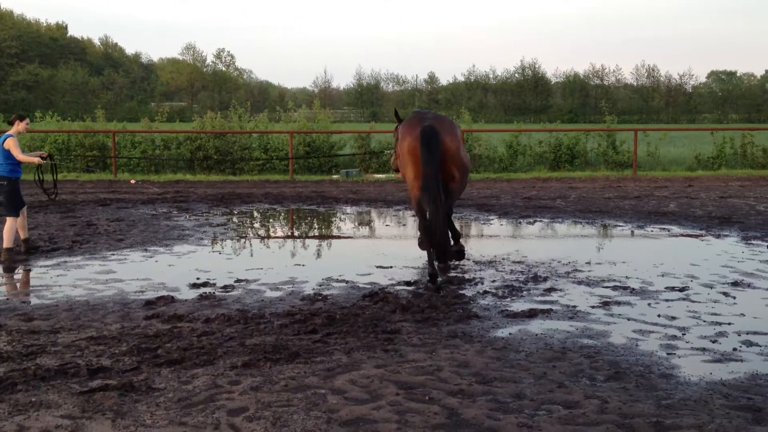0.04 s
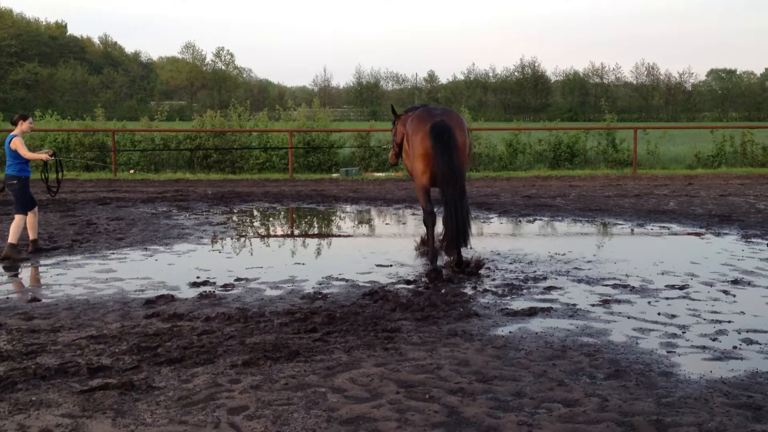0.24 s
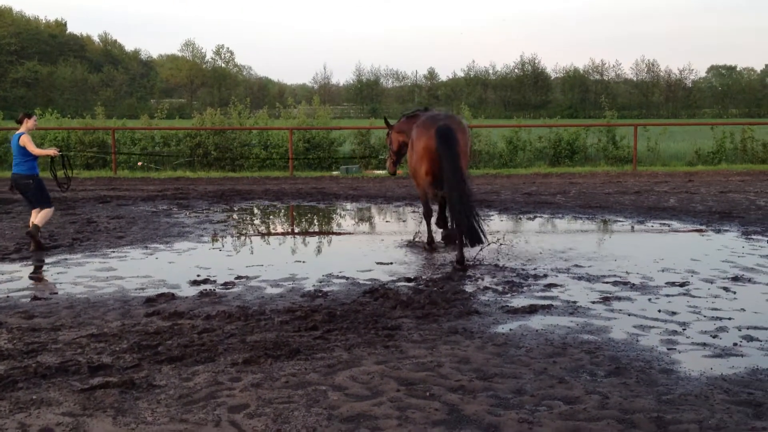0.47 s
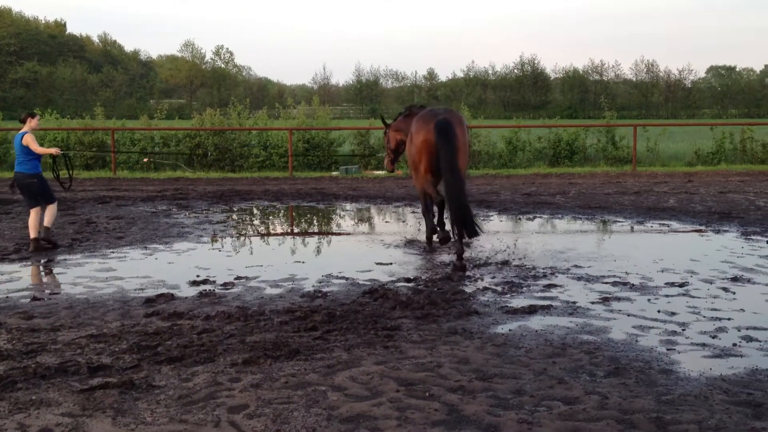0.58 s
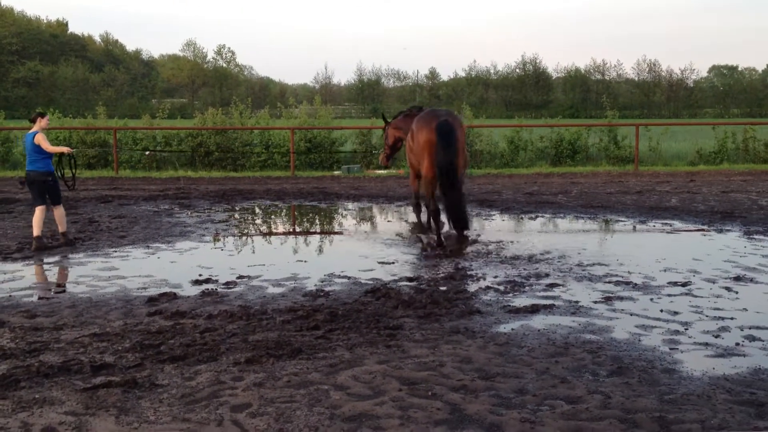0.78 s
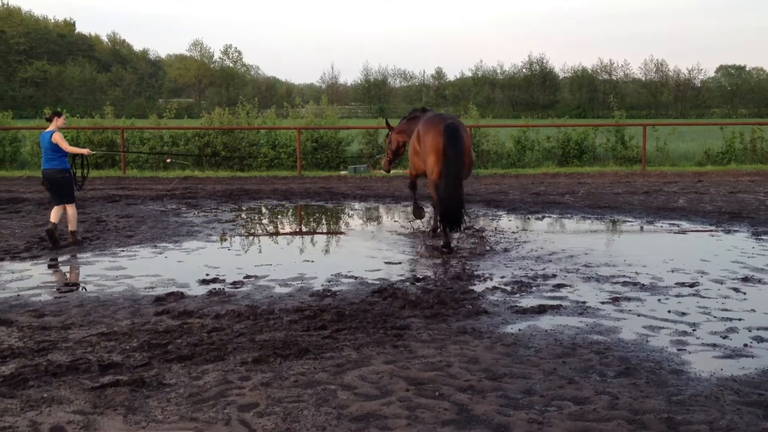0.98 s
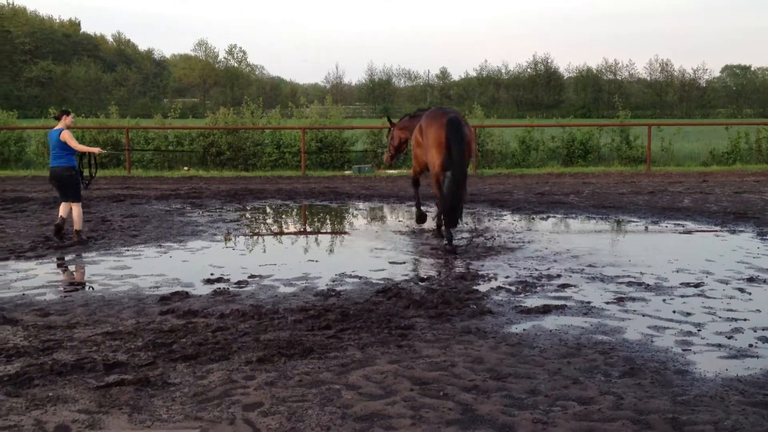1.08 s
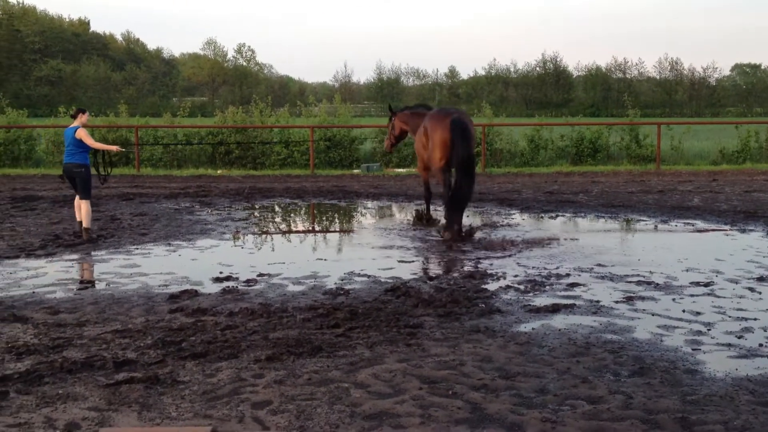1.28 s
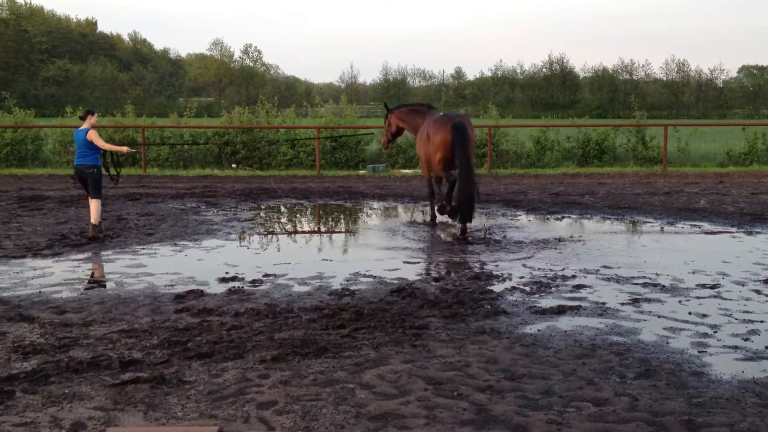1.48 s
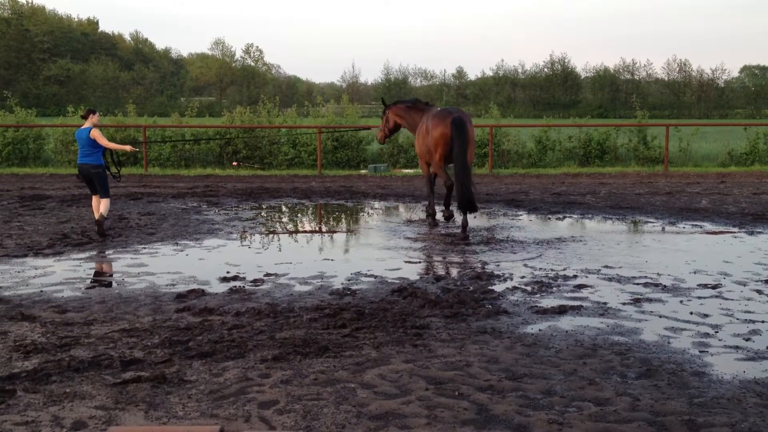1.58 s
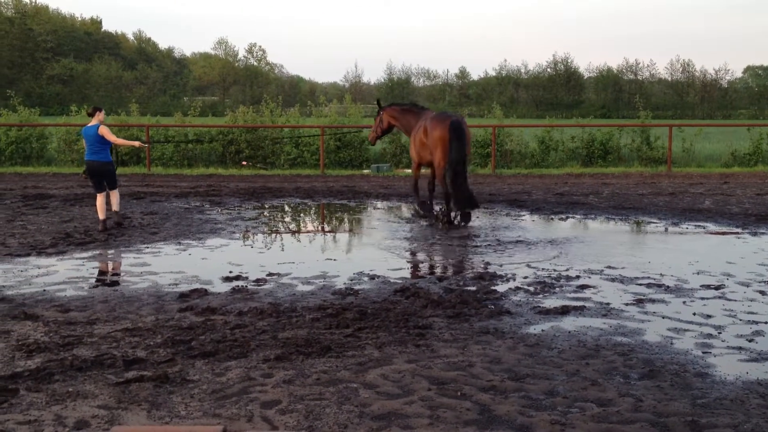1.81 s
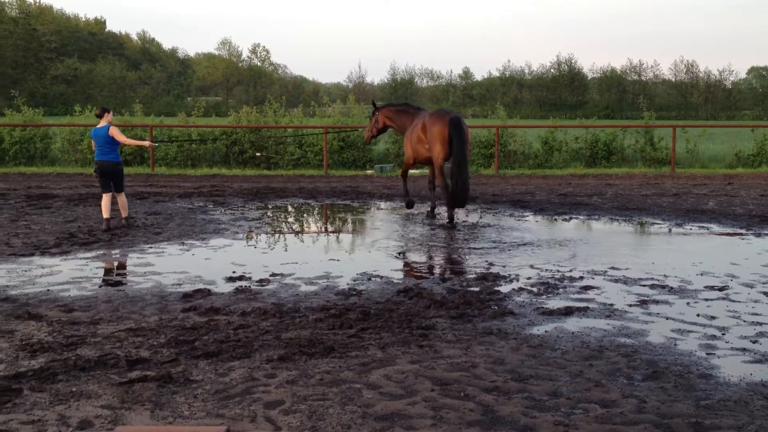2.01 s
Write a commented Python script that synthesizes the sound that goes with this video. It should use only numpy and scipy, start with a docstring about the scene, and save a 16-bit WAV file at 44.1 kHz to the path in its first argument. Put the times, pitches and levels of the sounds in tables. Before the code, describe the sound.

A horse's hooves splash through a shallow muddy puddle at a steady walk.

```python
"""A horse walks through a shallow muddy puddle in an open paddock, some metres away, two steps a second.
Each hoof slaps the water, traps a pocket of air that plops, and thuds into the mud; spray patters back
and muddy water closes around the hoof. Between the steps the legs drag through the water, heard as
swarms of tiny ringing bubbles. A hush of light wind, a distant bird and a dull echo lie behind."""
import sys
import numpy as np
from scipy import signal
from scipy.io import wavfile

SR = 44100
rng = np.random.default_rng(int(sys.argv[2]) if len(sys.argv) > 2 else 0)


def unload_audio(sound):
    """Save the sound as a 16-bit wav file, at the path given as the first command line argument."""
    columns = np.transpose(np.atleast_2d(sound))
    # keep every value between -1 and 1, then stretch to whole-number steps
    steps = np.round(np.clip(columns, -1, 1) * 32767)
    wavfile.write(sys.argv[1], SR, steps.astype(np.int16))


N = 90404


def amp(db):
    """Decibels to gain."""
    return 10 ** (np.asarray(db) / 20)


def unit(x):
    """Scales to rms 1."""
    return x / np.sqrt(np.mean(x ** 2) + 1e-20)


def add(mix, start, sound):
    """Mixes a sound in at a start time in seconds."""
    part = mix[max(round(start * SR), 0):][:len(sound)]
    part += sound[:len(part)]


def colour(x, points):
    """Minimum-phase EQ through (Hz, dB) points."""
    hz, db = np.transpose(points)
    bins_hz = abs(np.fft.fftfreq(4096, 1 / SR))
    log_gain = np.log(amp(np.interp(np.log(bins_hz + 1), np.log(hz), db)))
    taps = np.fft.ifft(np.exp(np.conj(signal.hilbert(log_gain)))).real
    return signal.fftconvolve(x, taps[:len(taps) // 2])[:len(x)]


def dull(x, hz):
    """Gentle low-pass."""
    return signal.sosfilt(signal.butter(2, min(hz, SR / 3), fs=SR, output="sos"), x)


def churn(t, hz):
    """Turbulent noise an octave either side of hz."""
    band = signal.butter(2, [hz / 2, min(hz * 2, SR * .45)], "bandpass", fs=SR, output="sos")
    return unit(signal.sosfilt(band, rng.standard_normal(len(t))))


def bubbles(lo_hz, hi_hz, per_s, spread_db, cycles, count=36):
    """A steady swarm of small bubbles of uneven size, each a short rising ring with a soft start."""
    out, t = np.zeros(N), np.arange(SR // 25) / SR
    for hz in np.geomspace(lo_hz, min(hi_hz, SR / 3), count):
        age = t * hz / cycles  # in decay times
        envelope = (1 - np.exp(-age / 0.35)) * np.exp(-age)
        glide = 1 + 0.028 * np.minimum(age, 6)
        ring = unit(envelope * np.sin(2 * np.pi * hz * t * glide))
        strength = amp(spread_db * np.minimum(rng.exponential(1, N), 4))
        births = rng.random(N) < per_s / count / SR
        out += np.sqrt(hz) * signal.oaconvolve(strength * births, ring)[:N]
    return unit(out)


# Tone of the bright spray and the darker slosh. Each row: frequency in Hz, relative gain in dB.
SPRAY_EQ = [(200, -49), (1200, 9.5), (2400, -6), (3300, 0.5), (4300, -2), (7500, -5), (12000, -6),
            (16000, -17)]
SLOSH_EQ = [(60, -45), (150, -15), (350, -10.5), (600, -1), (1250, 0), (1900, 1), (2600, -0.5), (4000, -30),
            (12000, -52)]
# Fader moves for the stirred water. Each row: time in seconds, spray level in dB, slosh level in dB.
WADING_LEVELS = [(0, -60, -76), (.06, -61.5, -61), (.11, -63.5, -74), (.19, -55.5, -58), (.32, -56, -55),
                 (0.441, -55.5, -61.5), (.51, -54, -55.5), (.61, -49.5, -56.5), (.70, -47, -54),
                 (.82, -50, -56.5), (.90, -56.5, -57), (0.968, -49, -51), (1.019, -51, -56.5),
                 (1.15, -46.5, -54), (1.25, -43.5, -45), (1.33, -48.5, -49.5), (1.38, -53.5, -55),
                 (1.46, -55, -57), (1.55, -50, -60), (1.69, -51, -52), (1.80, -54.5, -59), (1.88, -59, -58),
                 (1.938, -54.5, -58.5), (2.05, -58, -66)]


def wading():
    """Legs drag through the puddle: drips patter over a fine fizz and the stirred water gurgles."""
    t = np.arange(N) / SR
    times, spray_db, slosh_db = np.transpose(WADING_LEVELS)
    drips = bubbles(2195, 9370, per_s=2700, spread_db=6.5, cycles=1.9)
    fizz = bubbles(1760, 15000, per_s=20000, spread_db=3.0, cycles=2.7)
    patter = unit(colour(amp(-4.5) * drips + fizz, SPRAY_EQ))
    gurgle = unit(colour(bubbles(562.4, 3230, per_s=1200, spread_db=3.5, cycles=4.8), SLOSH_EQ))
    return amp(np.interp(t, times, spray_db)) * patter + amp(np.interp(t, times, slosh_db)) * gurgle


# Tone of the wind bed. Each row: frequency in Hz, relative gain in dB.
WIND_EQ = [(20, -14), (55, -16), (100, 7.5), (160, -6), (400, -6), (1000, -18.5), (3000, -16.5),
           (8000, -19), (16000, -11)]


def wind():
    """Light wind lays a faint, steady hush under the scene."""
    return amp(-63.5) * unit(colour(rng.standard_normal(N), WIND_EQ))


# Air pockets closing at a hoof. Each row: start in seconds, level in dB, pitch in Hz, decay in seconds.
AIR_POCKETS = [(.061, -49, 1320, 0.0031), (.062, -44, 1924, .004), (.201, -41, 627, 0.0057),
               (.229, -41, 668, 0.011), (.2585, -25, 525, .008), (.266, -40, 687, 0.034),
               (.280, -25.5, 1440, 0.0056), (.303, -36.5, 665, 0.0065), (.654, -41.5, 584, 0.0075),
               (.749, -23.5, 562, 0.0038), (.760, -24, 758, 0.0073), (.768, -32.5, 587, 0.0095),
               (.781, -35, 686, 0.0081), (.843, -39.5, 350, .006), (.974, -45.5, 1210, 0.01),
               (1.120, -35, 1750, 0.0057), (1.143, -37.5, 810, 0.0056), (1.231, -40, 553, 0.014),
               (1.234, -36.5, 1260, 0.005), (1.2565, -36, 604, 0.013), (1.274, -30.5, 512, 0.0062),
               (1.310, -33.5, 688, 0.0048), (1.520, -49, 1790, 0.01), (1.547, -40.5, 712, 0.0043),
               (1.575, -34.5, 1790, 0.0036), (1.642, -47.5, 693, 0.017), (1.712, -38, 650, 0.012),
               (1.719, -26, 2510, 0.0039), (1.744, -27.5, 569, 0.0046), (1.760, -31, 1860, 0.0073),
               (1.794, -31.5, 633, 0.0028), (1.945, -45.5, 650, 0.0037)]


def plop(db, hz, decay):
    """A trapped air pocket rings and rises in pitch, then breaks up into churning water."""
    rise_s, glide_per_s = 0.0012, 3.2
    t = np.arange(SR // 8) / SR
    envelope = (1 - np.exp(-t / rise_s)) * np.exp(-t / decay)
    ring = np.sin(2 * np.pi * hz * t * (1 + glide_per_s * t / 2))
    breakup = 0.52 * np.tanh(t / decay) * churn(t, hz)
    return amp(db) * envelope * (ring + breakup)


# Single sharp drops. Each row: start in seconds, level in dB, pitch in Hz.
LARGE_DROPS = [(.1235, -38, 4640), (.1655, -31, 6340), (.425, -34, 3640), (.4984, -24, 4570),
               (.5665, -41, 7500), (.589, -31, 8500), (.7022, -23.5, 4240), (.7443, -19.5, 4650),
               (.7448, -23, 7230), (.837, -32, 3860), (.860, -31, 4200), (.946, -40.5, 4040),
               (1.0375, -38, 4250), (1.138, -31.5, 4700), (1.257, -25, 4070), (1.932, -40, 2570)]


def drop(db, hz):
    """A large drop plinks for a few cycles, with a noisy tick and a softened top."""
    decay_s, cutoff_hz = 0.00045, 1.6 * hz
    t = np.arange(SR // 50) / SR
    envelope = t * np.exp(-t / decay_s)
    ring = 0.5 * np.sin(2 * np.pi * hz * t)
    plink = envelope / envelope.max() * (ring + 0.34 * churn(t, hz))
    return amp(db) * dull(dull(plink, cutoff_hz), cutoff_hz)


# Bird calls. Each row: start and length in seconds, opening and closing pitch in Hz, level in dB.
BIRD_CHIRPS = [(.135, .035, 2700, 4140, -57), (.380, 0.024, 3700, 2640, -63)]


def bird_chirp(length, from_hz, to_hz, db):
    """A distant bird gives a faint, thin gliding whistle."""
    progress = np.linspace(0, 1, round(length * SR))
    hz = from_hz + (to_hz - from_hz) * progress ** 2
    envelope = np.sqrt(abs(np.sin(np.pi * progress)))
    return amp(db) * envelope * np.sin(2 * np.pi * np.cumsum(hz) / SR)


# Tone of the finest spray. Each row: frequency in Hz, relative gain in dB.
MIST_EQ = [(2000, -32), (5000, -5), (8000, -2), (12500, -3), (16000, -3)]
# Hooves breaking the water. Each row: peak time, rise and decay in seconds,
# spray level in dB, slosh level in dB, mist level in dB relative to the spray.
HOOF_SLAPS = [(0.2063, 0.00066, 0.0018, -46.5, -62, 13.5), (0.229, .011, .012, -39, -42, 6.5),
              (.260, 0.0055, 0.019, -34, -33.5, -29), (.283, .005, 0.014, -53, -38.5, -12),
              (.305, 0.0017, 0.0063, -45, -47, -15), (0.658, 0.003, 0.0044, -50, -43, -12),
              (0.7042, 0.0011, 0.0016, -46, -31.5, -23), (0.716, 0.0055, 0.021, -37, -37, -22),
              (0.743, 0.001, 0.015, -33, -38, -0.5), (0.76, 0.028, 0.053, -49.5, -43.5, -2),
              (1.119, .002, 0.003, -47, -42, -6), (1.143, 0.0068, .020, -41.5, -62, -24),
              (1.215, 0.0086, 0.0096, -45.5, -46, -14), (1.233, 0.0053, 0.035, -41.5, -42, -27),
              (1.257, .002, 0.017, -40, -34, -16), (1.311, .002, 0.0071, -55.5, -61, -24),
              (1.526, 0.0032, 0.0078, -49, -47.5, -23), (1.644, 0.0057, 0.011, -46, -50, -15),
              (1.7133, 0.00056, 0.0067, -45, -34.5, -22), (1.745, .010, 0.035, -41.5, -39, -5)]


def splashes():
    """Each hoof slap throws a dense burst of mist, spray and coarser, sloshing bubbles."""
    t, power = np.arange(N) / SR, np.zeros((3, N))
    for peak, rise, decay, spray_db, slosh_db, mist_db in HOOF_SLAPS:
        envelope = np.exp(-np.maximum((peak - t) / rise, (t - peak) / decay))
        power += (amp([[spray_db], [slosh_db], [spray_db + mist_db]]) * envelope) ** 2
    spray = unit(colour(bubbles(1990, 11840, per_s=18000, spread_db=0.5, cycles=1.13), SPRAY_EQ))
    slosh = unit(colour(bubbles(396, 3080, per_s=4000, spread_db=2.5, cycles=1.01), SLOSH_EQ))
    mist = unit(colour(rng.standard_normal(N), MIST_EQ))
    return (np.sqrt(power) * [spray, slosh, mist]).sum(0)


# Hooves landing in the mud. Each row: start in seconds, level in dB, pitch in Hz.
MUD_THUDS = [(.229, -45, 191), (.262, -34.5, 157), (.263, -45, 278), (.717, -37, 220), (.748, -33.5, 305),
             (.751, -38, 166.3), (1.234, -43, 250), (1.256, -31.5, 271), (1.257, -35, 150),
             (1.271, -37.5, 170), (1.714, -46, 213), (1.743, -40, 286), (1.746, -34.5, 144)]


def thud(db, hz):
    """The weight of the horse gives the mud a short, heavily damped push."""
    rise_s, decay_s = 0.0015, 0.01
    t = np.arange(SR // 8) / SR
    envelope = (1 - np.exp(-t / rise_s)) * np.exp(-t / decay_s)
    body = 0.32 * np.sin(2 * np.pi * hz * t)
    return amp(db) * envelope / envelope.max() * (body + 0.36 * churn(t, hz))


# Muddy water closing around a sunken hoof. Each row: peak time in seconds, level in dB.
BACKWASH_SWELLS = [(.345, -62), (.825, -55.5), (1.335, -55), (1.825, -56.5)]


def backwash():
    """Large soft bubbles gurgle as the hole in the mud fills."""
    rise_s, decay_s = 0.022, 0.061
    t, level = np.arange(N) / SR, np.zeros(N)
    for peak, db in BACKWASH_SWELLS:
        level += amp(db) * np.exp(-np.maximum((peak - t) / rise_s, (t - peak) / decay_s))
    return level * bubbles(289, 480, per_s=650, spread_db=0, cycles=5.0)


def reflection(sound, decay_s, cutoff_hz):
    """The surroundings smear a sound into a short, darkened tail."""
    t = np.arange(SR // 2) / SR
    tail = rng.standard_normal(len(t)) * np.exp(-t / decay_s)
    return dull(signal.fftconvolve(sound, tail / np.linalg.norm(tail)), cutoff_hz)


def paddock(direct):
    """The open paddock returns one close bounce, light scatter and a dull late echo."""
    bounce_s, scatter_s, echo_s, send_db = 0.001533, 0.007, 0.086, -13.5
    near = direct.copy()
    add(near, bounce_s, 0.25 * dull(direct, hz=3240))
    out = near.copy()
    add(out, scatter_s, amp(send_db) * reflection(near, decay_s=0.051, cutoff_hz=11000))
    add(out, echo_s, amp(send_db) * reflection(near, decay_s=0.028, cutoff_hz=303))
    return out


def scene():
    """The steps and the bird sound in the paddock, over the wind bed."""
    mix = splashes() + wading() + backwash()
    cues = (AIR_POCKETS, plop), (MUD_THUDS, thud), (LARGE_DROPS, drop), (BIRD_CHIRPS, bird_chirp)
    for table, sound in cues:
        for start, *settings in table:
            add(mix, start, sound(*settings))
    return (paddock(mix) + wind())[None]


# Tone of the microphone. Each row: frequency in Hz, gain in dB.
MICROPHONE_EQ = [(20, -21), (70, -16), (105, -16), (145, 1), (290, 2.5), (390, -4.5), (520, -2.5),
                 (1950, -4), (2250, -9.5), (3000, -4.5), (4700, 3.5), (5400, -6), (6300, -6), (7100, 1),
                 (8700, -1), (9900, -10), (11200, 0), (12400, 0.5), (13400, -7.5), (15000, -5)]


def record(dry):
    """A small microphone with thin bass and uneven treble, then a steep high cut."""
    high_cut = signal.firwin(511, cutoff=15600, window=("kaiser", 9), fs=SR)
    return signal.oaconvolve(colour(dry[0], MICROPHONE_EQ), high_cut, "same")[None]


dry = scene()
out = record(dry)
unload_audio(out)
```